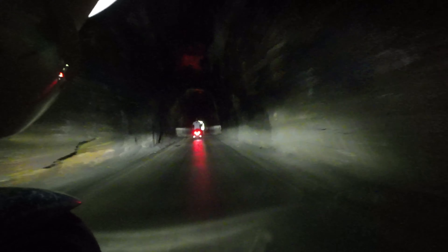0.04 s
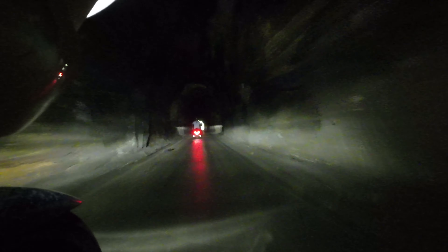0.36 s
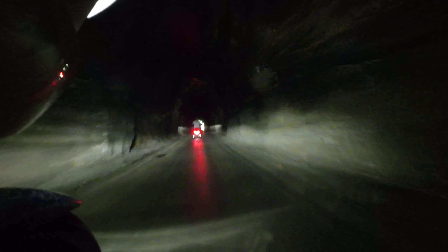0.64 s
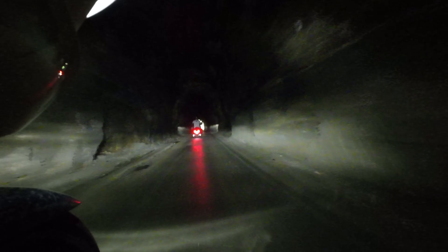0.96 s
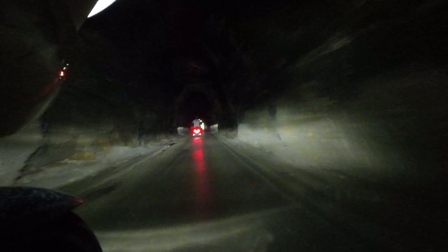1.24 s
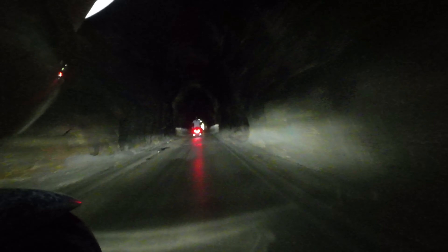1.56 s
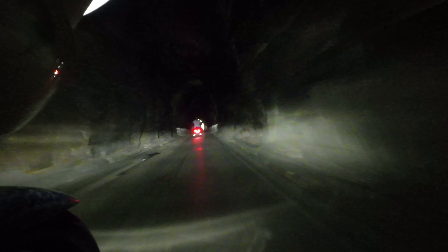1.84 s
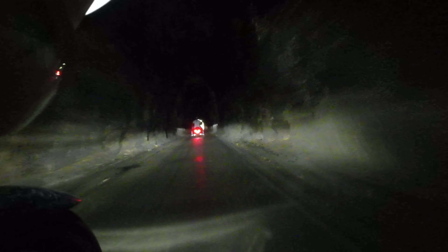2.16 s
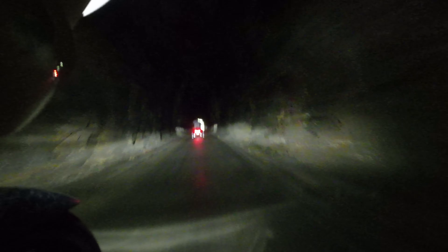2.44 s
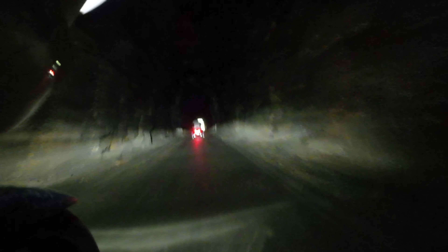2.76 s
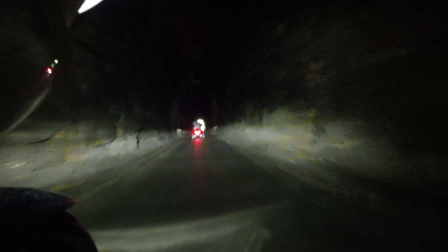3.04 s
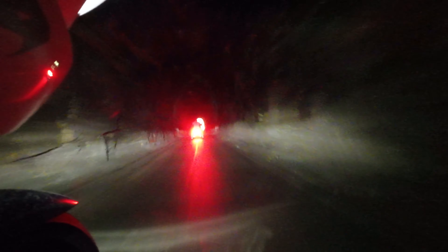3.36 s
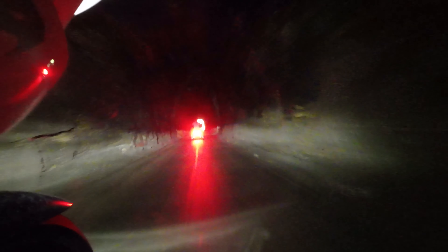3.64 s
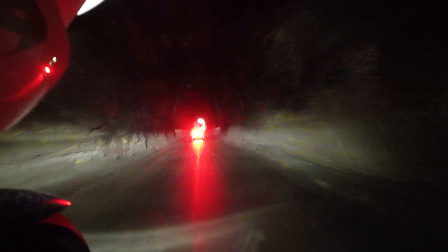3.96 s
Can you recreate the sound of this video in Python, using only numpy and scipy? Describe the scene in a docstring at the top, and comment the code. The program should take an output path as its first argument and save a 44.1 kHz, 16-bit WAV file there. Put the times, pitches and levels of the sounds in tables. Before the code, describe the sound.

A motorcycle engine drones low and steady in a narrow rock tunnel, heard from the rider's seat. Its echoing boom swells and fades over tyre roar and wind hiss. Near the end, bodywork rattles as the throttle opens slightly.

```python
"""A motorcycle's exhaust booms in a narrow rock tunnel, heard close up by a microphone at the rider's seat.
Two cylinders fire unevenly into the long echo, and single engine orders swell and fade as the machine
cruises through the standing waves. Around it the gears whine, tyres and air rush, and the chain ticks.
Near the end a loose metal part chinks and a bump rattles the bodywork as the throttle opens."""
import sys
import numpy as np
from scipy import signal
from scipy.fft import rfft, irfft, next_fast_len
from scipy.io import wavfile
from scipy.ndimage import map_coordinates

SR = 44100
rng = np.random.default_rng(int(sys.argv[2]) if len(sys.argv) > 2 else 0)


def generate_wav(signal):
    """Clip the signal to [-1, 1] and save it as 16-bit WAV at the path in sys.argv[1]."""
    frames = np.transpose(np.atleast_2d(signal))
    scaled = np.clip(frames, -1, 1) * 32767
    pcm = np.round(scaled).astype(np.int16)
    wavfile.write(sys.argv[1], SR, pcm)


N = 176400

# engine speed (time [s], rate [cycles/s])
ENGINE_SPEED = [(0, 18.9), (.4, 18.85), (.85, 18.5), (1.4, 18.65), (2.2, 18.25), (3.1, 18.65), (3.55, 18.8),
                (3.95, 19.8)]
# strength of the hiss, which the faint chain ticks follow (time [s], level [dB])
HISS_LEVEL = [(0, -36.5), (.15, -35), (.25, -37.5), (.7, -37.5), (1.26, -39.5), (2.0, -36.5), (2.29, -36.5),
              (2.36, -38.5), (3.0, -36.5), (3.76, -37), (3.93, -40)]


def amp(db):
    """Decibels to gain."""
    return 10 ** (np.asarray(db) / 20)


def unit(x):
    """Scale to rms 1."""
    return x / np.sqrt(np.mean(x ** 2) + 1e-20)


def along(points, hz):
    """Interpolate (Hz, value) points on a log frequency axis."""
    freqs, values = np.transpose(points)
    return np.interp(np.log(hz + 1), np.log(freqs + 1), values)


def curves(rows):
    """One value per sample for each column after the time."""
    times, *columns = np.transpose(rows)
    return [np.interp(np.arange(N) / SR, times, column) for column in columns]


def wobble(rate):
    """A smooth random curve, rate knots a second."""
    return map_coordinates(rng.standard_normal(8192), [np.arange(N) * rate / SR], mode="wrap")


def angle(hz):
    """Running phase of a frequency curve."""
    return 2 * np.pi * np.cumsum(hz) / SR


def filtered(x, response):
    """Filter x by a gain given as a function of frequency."""
    size = next_fast_len(N + SR // 2)
    return irfft(rfft(x, size) * response(np.fft.rfftfreq(size, 1 / SR)), size)[..., :N]


def noise(spectrum):
    """Coloured noise of rms 1."""
    return unit(filtered(rng.standard_normal(N), lambda hz: amp(along(spectrum, hz))))


def ringing(modes):
    """Noise of rms 1 in a body's resonances."""
    def body(hz):
        return sum((-1) ** k * amp(db) * 1j * hz * width / (centre ** 2 - hz ** 2 + 1j * hz * width)
                   for k, (centre, width, db) in enumerate(modes))
    return unit(filtered(rng.standard_normal(N), body))


def fuzzy(phase, rate):
    """A tone whose strength and phase wander rate times a second."""
    return unit(wobble(rate) * np.cos(phase) + wobble(rate) * np.sin(phase))


def blows(events, t60_s, attack_s):
    """Envelope of (s, dB) contacts that rise fast and die away."""
    envelope, t = np.zeros(N + SR), np.arange(SR // 4) / SR
    for start, db in events:
        envelope[max(round(start * SR), 0):][:len(t)] += amp(db - 60 * t / t60_s) * (1 - np.exp(-t / attack_s))
    return envelope[:N]


def tunnel():
    """The long echo of the rock walls, of energy 1."""
    # reverberation (frequency [Hz], time to fall 60 dB [s])
    decay = [(60, 2.34), (500, 0.95), (12000, .2)]
    hz, t, spectra = signal.stft(rng.standard_normal(SR), SR, nperseg=256)
    tail = signal.istft(spectra * amp(-60 * t / along(decay, hz)[:, None]), SR, nperseg=256)[1]
    return tail / np.linalg.norm(tail)


def rumble():
    """The tunnel's low rumble, all around the rider."""
    # colour of the rumble (frequency [Hz], relative level [dB])
    spectrum = [(15, -36), (27, -22), (45, -6), (62, -4.5), (88, -5), (112, -3.5), (126, 0.5), (158, -7),
                (185, -13.5), (220, -9.5), (255, -16), (300, -18), (380, -32), (700, -77)]
    # its strength (time [s], level [dB])
    level = [(0, -16), (.7, -17), (1.3, -18), (1.75, -19), (2.7, -16.5), (3.1, -14), (3.8, -16)]
    return amp(curves(level)[0]) * noise(spectrum)


def hiss():
    """A fluttering, grainy hiss whose treble dips near the end."""
    # colour of the hiss (frequency [Hz], relative level [dB])
    spectrum = [(1000, -1), (2200, -1.5), (3200, 2.5), (4000, -1), (4700, -2.5), (5700, 0.5), (6300, -6),
                (7500, -5.5), (9000, -10), (9900, -6), (11500, -9), (12700, -21), (14000, -32),
                (15600, -21)]
    # trim above 6300 Hz (time [s], gain [dB])
    treble_trim = [(3.68, -0.5), (3.95, -3.5)]
    flutter_db = 1.04 * wobble(55) + 0.8 * wobble(600)
    spray = amp(curves(HISS_LEVEL)[0] + flutter_db) * noise(spectrum)
    treble = filtered(spray, lambda hz: hz > 6300)
    return spray - treble + amp(curves(treble_trim)[0]) * treble


def wind():
    """A breathy, gliding band of wind; thinner whistles come and go."""
    # breathy band (time [s], centre [Hz], level [dB])
    band = [(0, 2006, -42.5), (.4, 1928, -39.5), (1.2, 1876, -41), (1.55, 2035, -40.5), (1.8, 2214, -47),
            (2.6, 2230, -42.5), (4, 2354, -53)]
    # thin whistles (start [s], end [s], pitch [Hz], level [dB])
    whistles = [(1.503, 2.75, 2356, -45), (2.75, 3.4, 1786, -43)]
    hz, db = curves(band)
    air = amp(db + 1.25 * wobble(29.8)) * fuzzy(angle(hz), rate=210)
    t = np.arange(N) / SR
    for start, end, pitch, level in whistles:
        progress = np.clip((t - start) / (end - start), 0, 1)
        swell = np.sqrt(np.abs(np.sin(np.pi * progress)))
        air += amp(level) * swell * fuzzy(2 * np.pi * pitch * t, rate=80)
    return air


def tyres():
    """The tyres roar on the road below the seat, with brief rough surges."""
    # colours of the roar and the surges (frequency [Hz], relative level [dB])
    roar_spectrum = [(120, -27), (300, -10.5), (380, 0), (470, 0.5), (570, -3.5), (780, -4), (1000, -10),
                     (1200, -11.5), (1700, -12.5), (2400, -13.5), (3200, -35), (7000, -52)]
    surge_spectrum = [(700, -14), (1500, 0), (2600, -8), (9000, -36)]
    # strength of the roar, and onsets of the surges (time [s], level [dB])
    roar_level = [(0, -28.5), (1.05, -31), (2.2, -28.5), (3.55, -28), (4, -30.5)]
    onsets = [(.095, -22), (.62, -27.5), (1.975, -26), (2.88, -31), (3.05, -25.5)]
    grit = amp(0.85 * wobble(70))
    roar = amp(curves(roar_level)[0]) * noise(roar_spectrum)
    surges = blows(onsets, t60_s=0.27, attack_s=0.027) * noise(surge_spectrum)
    return grit * (roar + surges)


def chain():
    """The chain ticks: faint ticks run between the stronger ones and rise and fall with the hiss."""
    # stronger ticks (time [s], relative level [dB])
    strong = [(0.4159, -39), (0.5042, -39), (0.6812, -39), (1.5572, -42), (1.8765, -41), (1.9559, -38),
              (2.1983, -43), (2.9785, -41), (3.1298, -38), (3.432, -41), (3.5043, -38), (3.5782, -39.5),
              (3.652, -40)]
    # resonances of the chain (centre [Hz], width [Hz], gain [dB])
    modes = [(4330, 130, 5.5), (5900, 250, 0), (7400, 1500, -6), (9910, 200, 7), (10600, 900, -11)]
    ticks_per_s, t60_s, attack_s = 12.5, 0.044, 0.00092
    faint = []
    for (start, _), (end, _) in zip(strong, strong[1:]):
        steps = max(round((end - start) * ticks_per_s), 1)
        faint += [(s, -40 + 2 * rng.standard_normal()) for s in np.linspace(start, end, steps + 1)[1:-1]]
    hiss_db, = curves(HISS_LEVEL)
    swell = amp(hiss_db - hiss_db.mean())
    ticks = swell * blows(faint, t60_s, attack_s) + amp(4.5) * blows(strong, t60_s, attack_s)
    return ticks * ringing(modes)


def loose_metal():
    """A loose metal part chinks twice in quick succession."""
    # contacts (time [s], relative level [dB])
    chinks = [(3.3587, -27), (3.3687, -21.5)]
    # resonances of the part (centre [Hz], width [Hz], gain [dB])
    modes = [(7100, 300, 4), (9530, 600, -3), (11200, 800, -7), (15000, 2500, -23)]
    return amp(-5) * blows(chinks, t60_s=0.028, attack_s=0.00063) * ringing(modes)


def bodywork():
    """A bump gives the panels near the microphone dull knocks, and the tunnel answers."""
    # contacts over the bump (time [s], level [dB])
    contacts = [(3.712, -14), (3.735, -12.5), (3.761, -12), (3.781, -12.5), (3.806, -19)]
    # resonances of the panels (centre [Hz], width [Hz], gain [dB])
    modes = [(500, 110, 2), (767, 180, 4.5), (1010, 91, 8), (1310, 180, -2.5), (1625, 340, -5.5),
             (2450, 670, -8.5)]
    dull_panel = unit(filtered(ringing(modes), lambda hz: 1 / (1 + (hz / 3200) ** 2)))
    knocks = blows(contacts, t60_s=0.035, attack_s=0.00055) * dull_panel
    return knocks + amp(-3.5) * signal.fftconvolve(knocks, tunnel())[:N]


def intake():
    """The air intake growls once the throttle opens."""
    throttle_s, rise_s, growl_hz = 3.7, 0.042, 778
    opening = np.clip((np.arange(N) / SR - throttle_s) / rise_s, 0, 1)
    return amp(-33.5) * opening * fuzzy(angle(np.full(N, growl_hz)), rate=400)


def gears():
    """Meshing gears give a wavering whine with a rough halo of tunnel echo, and its octave."""
    # strength of the whine (time [s], level [dB])
    level = [(0, -28.5), (.2, -41.5), (1.1, -35), (1.25, -38), (2.05, -31.5), (2.42, -28.5), (2.62, -41),
             (2.9, -31.5), (3.25, -32.5), (3.55, -43), (4, -34)]
    mesh_hz = 493
    mesh = angle(np.full(N, mesh_hz)) + 0.45 * wobble(14)
    whine = amp(2.6 * wobble(12)) * np.sin(mesh)
    halo = amp(-3) * fuzzy(mesh, rate=69.96)
    octave = amp(-16.5) * fuzzy(2 * mesh, rate=25.06)
    return amp(curves(level)[0]) * (whine + halo + octave)


def exhaust():
    """Uneven firing pulses of two cylinders, through the pipe and the tunnel."""
    # response of the pipe (frequency [Hz], relative gain [dB])
    pipe = [(22, -26), (55, -3.5), (135, -5), (190, -9.5), (340, -20), (490, -19.5), (800, -26),
            (1500, -71)]
    twin_lag_cycles, jitter_s, scatter_db = 0.39, 0.00076, 4
    cycles = np.cumsum(curves(ENGINE_SPEED)[0]) / SR
    firings = (np.arange(int(cycles[-1]))[:, None] + [0, twin_lag_cycles]).ravel()
    timing, strength = rng.standard_normal((256, 2))[:len(firings)].T
    samples = np.searchsorted(cycles, firings) + jitter_s * SR * timing
    pulses = np.bincount(np.clip(samples, 0, N - 1).astype(int), amp(scatter_db * strength), N)
    echoed = irfft(rfft(pulses) * rfft(tunnel(), N), N)
    return amp(-20.5) * unit(filtered(echoed, lambda hz: amp(along(pipe, hz))))


def boom():
    """Engine orders swell and fade as the motorcycle moves through the tunnel's standing waves."""
    # low multiples of the cycle rate, lifted by the tunnel (time [s], level [dB])
    order_2 = [(0, -55), (.6, -31), (2.0, -43), (2.9, -33), (3.35, -25.5), (3.7, -32)]
    order_3 = [(0.0, -25), (0.2, -35), (0.48, -14.5), (1.1, -32), (2.35, -19.5), (2.65, -36), (3.5, -19),
               (3.9, -38)]
    order_4 = [(0.0, -19.5), (.95, -21), (1.7, -30), (2.01, -22), (2.67, -21), (2.9, -35), (3.26, -11.5),
               (3.48, -21), (3.99, -22)]
    order_5 = [(0.0, -18.5), (0.18, -15), (0.55, -26.5), (0.82, -11), (1.15, -14.5), (1.35, -19.5),
               (2.1, -19.5), (2.22, -27), (3.05, -17), (3.42, -26), (3.6, -14), (3.99, -15)]
    order_7 = [(0.0, -38), (0.27, -41), (0.42, -18), (0.54, -38), (0.75, -19), (1.3, -34), (1.48, -15),
               (1.77, -17.5), (1.88, -34), (2.0, -13.5), (2.6, -26), (3.99, -20)]
    # upper multiples, smeared by the echo (time [s], level [dB])
    order_9 = [(0, -33), (4, -31)]
    order_12 = [(0, -28.5), (1.6, -33), (2.3, -31.5), (2.6, -29), (3.3, -27), (4, -41)]
    order_16 = [(0, -31), (.7, -28.5), (1.25, -33), (1.7, -31), (2.2, -38.5), (4, -40)]
    order_18 = [(2.1, -52), (2.699, -27), (3.7, -60)]
    waver_db, drift_rad = 3.5, 0.25
    cycle_phase = angle(curves(ENGINE_SPEED)[0])
    drone = np.zeros(N)
    for order, level in [(2, order_2), (3, order_3), (4, order_4), (5, order_5), (7, order_7)]:
        rms = amp(curves(level)[0] + waver_db * wobble(17))
        phase = order * cycle_phase + rng.uniform(0, 2 * np.pi) + drift_rad * wobble(7.7)
        drone += np.sqrt(2) * rms * np.sin(phase)
    for order, level in [(9, order_9), (12, order_12), (16, order_16), (18, order_18)]:
        drone += amp(curves(level)[0]) * fuzzy(order * cycle_phase, rate=16)
    return drone


def scene():
    """All sources reach one microphone at the seat; the bass leans slightly left."""
    # stereo balance (frequency [Hz], left over right [dB])
    balance = [(125, 1.04), (260, 0)]
    engine = exhaust() + boom() + intake() + gears()
    rush = rumble() + tyres() + hiss() + wind()
    rattles = chain() + loose_metal() + bodywork()
    return filtered(engine + rush + rattles, lambda hz: amp(np.outer([.5, -.5], along(balance, hz))))


def record(dry):
    """The recorder rounds off the highest peaks and keeps nothing above its band limit."""
    limit_hz = 15720
    rounded = dry / (1 + np.abs(dry) ** 10) ** (1 / 10)
    return filtered(rounded, lambda hz: hz < limit_hz)


dry = scene()
out = record(dry)
generate_wav(out)
```